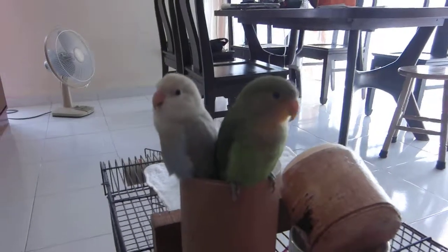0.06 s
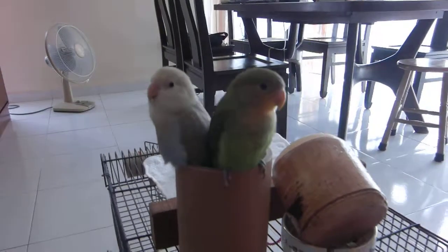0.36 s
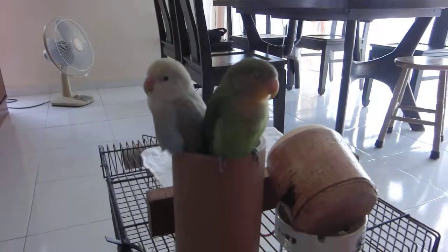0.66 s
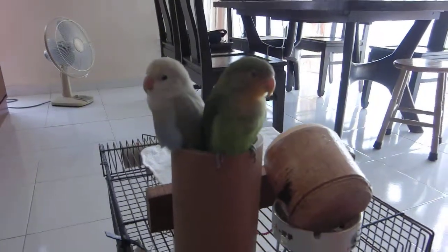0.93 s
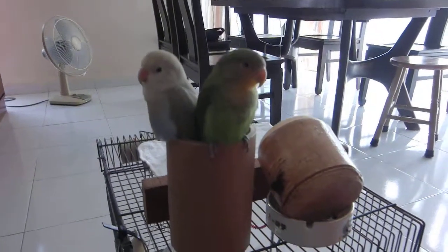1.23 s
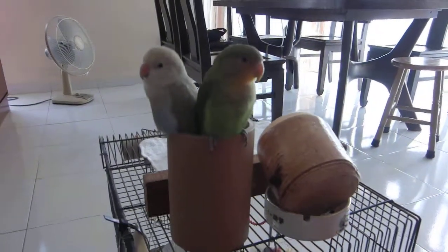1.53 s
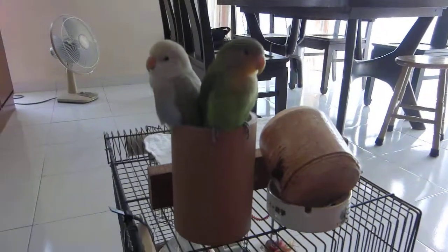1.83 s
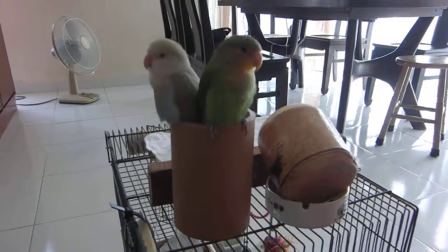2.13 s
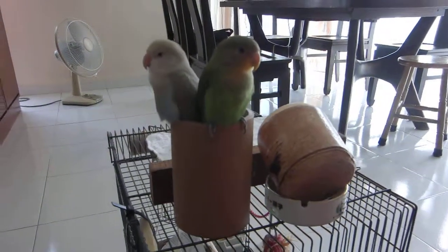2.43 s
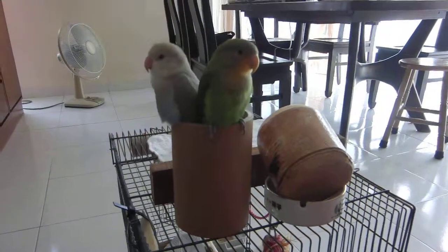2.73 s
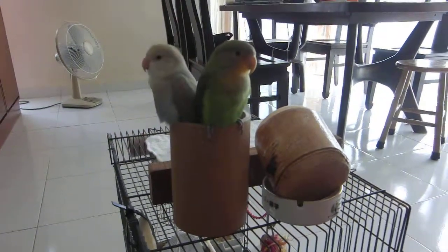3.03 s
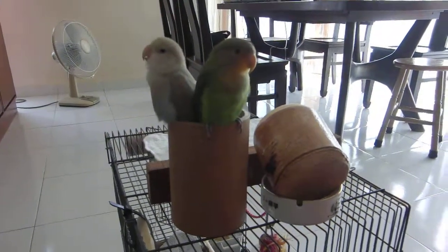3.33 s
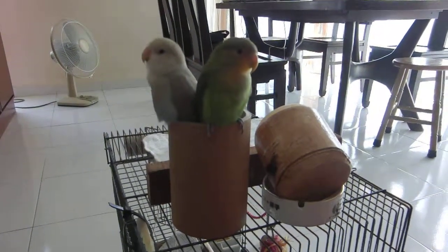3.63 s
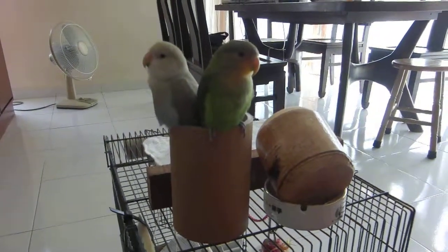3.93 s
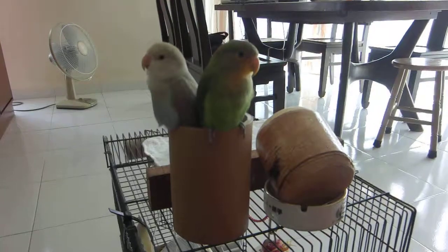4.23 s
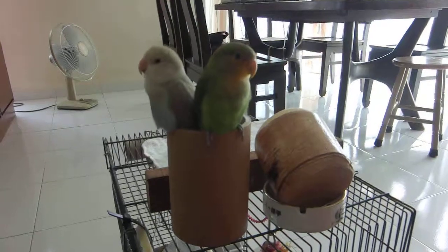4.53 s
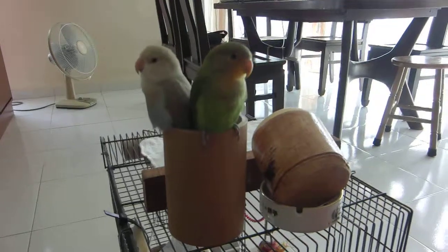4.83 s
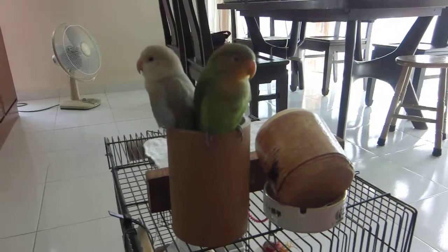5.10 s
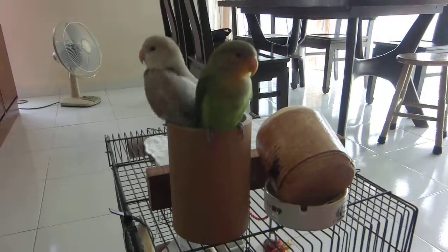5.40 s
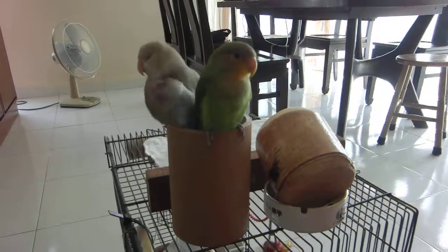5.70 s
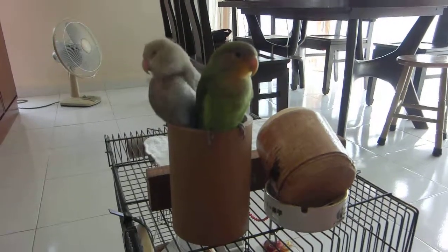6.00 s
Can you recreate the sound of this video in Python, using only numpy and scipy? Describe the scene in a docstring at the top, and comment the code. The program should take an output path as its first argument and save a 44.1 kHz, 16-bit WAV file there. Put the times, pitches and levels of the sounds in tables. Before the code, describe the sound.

Small parrots call close to a stereo microphone in a tiled room, while a fan rushes softly and a deep hum swells and fades. First comes a brief reedy warble with a whistle in its middle. A beak click leads into four quick, shrill rising chirps, the loudest sounds. A soft chuck and squawk follow, then very faint feather preening. A thin, barely audible whine sinks slowly toward the end.

```python
"""Lovebirds in a tiled room

Two lovebirds perch on their cage, close to a stereo microphone. One gives a reedy warble with a
whistle in its middle, four shrill rising chirps and a soft chuck and squawk; then feathers are preened.
Each call is a buzz of the syrinx, filtered by the throat and beak and prolonged by the room.
Under them a fan rushes, a deep hum swells and fades, and a faint whine sinks slowly."""
import sys
import numpy as np
from scipy import signal
from scipy.fft import rfft, irfft
from scipy.io import wavfile
from scipy.ndimage import uniform_filter1d

SR = 44100
rng = np.random.default_rng(int(sys.argv[2]) if len(sys.argv) > 2 else 0)


def unload_wav(signal):
    """Save mono or channel-first audio to the path in sys.argv[1] as 16-bit WAV at rate SR, clipped to [-1, 1]."""
    wavfile.write(
        sys.argv[1],
        SR,
        np.round(np.clip(np.atleast_2d(signal).T, -1, 1) * 32767).astype(np.int16),
    )


N = 267157
TIME, BINS = np.arange(N) / SR, np.fft.rfftfreq(N, 1 / SR)


def amp(db):
    """Amplitude ratio of a level in decibels."""
    return 10 ** (np.asarray(db) / 20)


def unit(x):
    """Normalisation to an rms of one."""
    return x / np.sqrt(np.mean(x ** 2) + 1e-20)


def read(points, hz):
    """Interpolation of a table on a logarithmic frequency axis."""
    f, value = np.transpose(points)
    return np.interp(np.log(hz + 1), np.log(f + 1), value)


def noise(spectrum, size=N):
    """Spectral shaping: white noise filtered to the given colour, of rms one."""
    gain = amp(read(spectrum, np.fft.rfftfreq(size, 1 / SR)))
    return unit(irfft(rfft(rng.standard_normal(size)) * gain, size))


def waver(rate_hz, size=N):
    """Random modulation: noise of rms one, low-passed near the given rate."""
    gain = np.exp(-(np.fft.rfftfreq(size, 1 / SR) / rate_hz) ** 2)
    return unit(irfft(rfft(rng.standard_normal(size)) * gain, size))


def fan(side_db=-10.0, left_db=1.42, fade_db_per_s=-0.0655):
    """Turbulent air radiates broadband noise, nearly coherent in the bass and diffuse in the treble."""
    # spectra of the channels' sum and difference: f/Hz, relative level/dB
    mid_spectrum = [(12, -40), (20, -16.5), (44, 1.5), (64, -3), (80, -5.5), (100, -3), (161, -5),
                    (196, -6.5), (232, -8), (298, -2), (352, -11), (705, -14.5), (1980, -23), (2470, -27),
                    (3750, -35.5), (15500, -56.5)]
    side_spectrum = [(12, -22.5), (20, 0), (196, -8.5), (232, -5), (289, -11.5), (342, -10.5), (1380, -8),
                     (2090, -10), (2470, -8.5), (9930, -24.5), (15500, -32.5)]
    mid, side = noise(mid_spectrum), amp(side_db) * noise(side_spectrum)
    stereo = np.array([mid * amp(left_db) + side, mid * amp(-left_db) - side])
    return amp(-48.5 + fade_db_per_s * TIME) * stereo


def drone(hz, level_db, jitter, rate_hz):
    """A sinusoid under random frequency and amplitude modulation."""
    phase = 2 * np.pi * np.cumsum(hz * (1 + jitter * waver(rate_hz))) / SR
    return np.sqrt(2) * amp(level_db + 1.3 * waver(rate_hz)) * np.sin(phase)


def hum(rest_hz=45.6, rest_db=-63.5):
    """A deep tone whose swells, Gaussian in rise and exponential in decay, pull it to their own pitch."""
    # swells: peak t/s, f/Hz, level/dB, rise t/s, decay t/s
    swells = [(1.15, 53.24, -48, 0.12, .25), (3.03, 44.3, -48, .1, 0.12), (4.2, 43.8, -49.5, 0.21, .6)]
    envelopes = [amp(db) * np.exp(-np.where(TIME < peak, ((TIME - peak) / rise) ** 2,
                                            (TIME - peak) / decay))
                 for peak, _, db, rise, decay in swells]
    strength = amp(rest_db) + sum(envelopes)
    pull_hz = sum(envelope * (hz - rest_hz) for envelope, (_, hz, *_) in zip(envelopes, swells))
    tone = drone(rest_hz + pull_hz / strength, 20 * np.log10(strength), jitter=0.017, rate_hz=7.9)
    return tone * amp([[1.1], [-1.1]])


def syrinx(start, hz, level_db, throat, even_db, jitter, rasp_db,
           slope_db_per_octave, rasp_db_per_octave, shimmer, flutter_hz):
    """Source and filter: the syrinx buzzes, and the throat colours its harmonics and breath alike."""
    out, n = np.zeros(N), len(hz)
    tremble, throb = waver(flutter_hz, size=SR)[:n], waver(flutter_hz, size=SR)[:n]
    air = noise([(f, db + rasp_db_per_octave * np.log2(f)) for f, db in throat], size=SR)[:n]
    k, t = np.arange(1, 11)[:, None], np.arange(n) / SR
    # the symmetry of the vibration sets even against odd harmonics
    source_db = slope_db_per_octave * np.log2(k) + even_db * (k % 2 == 0)
    phase = 2 * np.pi * np.cumsum(hz * (1 + jitter * tremble)) / SR
    partials = amp(read(throat, k * hz) + source_db) * (k * hz < SR / 2)
    tone = (partials * np.sin(k * phase)).sum(0) / np.sqrt((partials ** 2).sum(0) / 2)
    voice = tone * (1 + shimmer * throb) + amp(rasp_db) * air
    edges = np.clip(np.minimum(t, t[::-1]) / .001, 0, 1)
    out[round(start * SR):][:n] = edges * amp(level_db) * voice
    return out


def soft_calls(settle_share=0.48, trill_hz=70.7, onset_db=-11, end_db=-12.5):
    """Frequency modulation: each note trills about an exponential glide as it swells and sinks."""
    # four warble notes, three of chuck and squawk: start t/s, length t/s, first f/Hz, last f/Hz,
    # level/dB, peak time/length, trill depth, jitter, even harmonics/dB, rasp/dB
    notes = [ (1.267, .028, 2023, 2165, -17.5, 0.98, 0.05, 0.013, -2, -17.5),
             (1.293, .044, 3470, 3713, -23, 0.77, 0.0032, .011, -3, -12.5),
             (1.344, 0.026, 3630, 3550, -25, 0.64, 0.0033, 0.0074, -1, -9),
             (1.367, .079, 2860, 1636, -25, 0.35, 0.0083, 0.0227, -2.5, -14.5),
             (4.27, 0.0356, 1706, 1559, -29, .35, 0.049, 0.018, 4, -18),
             (4.339, 0.03, 1735, 1730, -32, .25, 0.0088, 0.051, 0.5, -13),
             (4.36, 0.024, 1570, 1475, -31.5, .8, 0.015, 0.023, 2.5, -7)]
    # throat response, beak half open: f/Hz, level/dB
    half_beak = [(200, -19.5), (1100, -0.5), (1550, -3.5), (2200, -15.5), (2700, -0.5), (3200, 6.5),
                 (4200, 1.5), (6000, 6.5), (6700, 0.5), (7400, -0.5), (9000, -3), (11000, -3),
                 (12800, -14.5), (15500, -9)]
    out = np.zeros(N)
    for start, length, first_hz, last_hz, db, peak, trill, jitter, even_db, rasp_db in notes:
        t = np.arange(0, length, 1 / SR)
        u, peak = t / length, np.clip(peak, .05, .95)
        settled = np.expm1(-u / settle_share) / np.expm1(-1 / settle_share)
        glide_hz = first_hz + (last_hz - first_hz) * settled
        hz = glide_hz * (1 + trill * np.cos(2 * np.pi * trill_hz * t))
        sag_db = np.where(u < peak, onset_db * (1 - u / peak) ** 2,
                          end_db * ((u - peak) / (1 - peak)) ** 2)
        out += syrinx(start, hz, db + sag_db, half_beak, even_db, jitter, rasp_db,
                      slope_db_per_octave=-4, rasp_db_per_octave=2.5, shimmer=0.15, flutter_hz=600)
    return out


def preening():
    """Impulsive excitation: each beak click or feather flick is noise that decays exponentially."""
    # clicks and flicks: t/s, level/dB, decay t/s
    ticks = [(2.801, -38, 0.0009), (2.812, -28.5, 0.00097), (5.172, -51, .003), (5.329, -54, 0.02),
             (5.42, -60, 0.032), (5.6, -61, 0.022), (5.85, -64, 0.027)]
    # their spectrum: f/Hz, relative level/dB
    colour = [(1000, -18.5), (3500, -2.5), (5300, -2), (7000, -8.5), (15000, -8.5)]
    envelope = sum(amp(db) * (TIME >= start) * np.exp(-abs(TIME - start) / decay)
                   for start, db, decay in ticks)
    return envelope * noise(colour)


def chirps(lead_arch=.16, top_arch=0.045, peak_share=.65, break_ratio=1.25, flicker_hz=219):
    """A frequency jump: after a lead-in, a climbing whistle flickers and breaks to a weaker top note."""
    # chirps: start t/s, lead-in t/s, whistle t/s, top note t/s, flicker t/s, lead-in f/Hz, whistle's
    # first f/Hz, last f/Hz, exponent of the climb, relative onset/dB, relative peak/dB, jitter, rasp/dB
    calls = [ (2.824, 0.0031, 0.031, 0.016, .001, 3610, 3620, 5183, 0.84, -24, -16.5, 0.026, -13),
             (3.0973, 0.013, 0.028, 0.012, .0005, 3098, 4520, 5486, 0.95, -20.5, -10.5, 0.021, -13.5),
             (3.3072, .0075, .034, 0.012, .005, 2505, 3880, 4910, 1.2, -26.5, -8, 0.023, -13.5),
             (3.487, 0.0082, .036, .014, .009, 4450, 3955, 5000, 1.8, -9, -10, .028, -13)]
    # throat response, beak wide open: f/Hz, level/dB
    open_beak = [(200, -16), (900, -10.5), (2300, -13), (3000, -11), (3750, -4.5), (4850, 1.5), (6300, 1.5),
                 (7400, -10), (8300, -4), (9600, -1.5), (10900, -1.5), (11700, -7), (13000, -5),
                 (14200, -9), (15500, -14)]
    out = np.zeros(N)
    for (start, lead, whistle, top, flicker, lead_hz, first_hz, last_hz,
         bend, onset_db, peak_db, jitter, rasp_db) in calls:
        t = np.arange(0, lead + whistle + top, 1 / SR)
        late = np.maximum(t - lead - whistle, 0) / top
        broken = t + flicker * np.tanh(waver(flicker_hz, size=SR)[:len(t)]) > lead + whistle
        lead_in = lead_hz * (1 - lead_arch * (2 * t / lead - 1) ** 2)
        climb = first_hz + (last_hz - first_hz) * np.clip((t - lead) / whistle, 0, 1) ** bend
        top_note = last_hz * break_ratio * (1 - top_arch * (2 * late - 1) ** 2)
        hz = np.where(t < lead, lead_in, np.where(broken, top_note, climb))
        effort_db = np.interp(t, [0, lead + peak_share * whistle], [onset_db, peak_db]) - 5 * late
        level_db = effort_db - 3 * (t < lead) - 3.5 * broken
        out += syrinx(start, hz, level_db, open_beak, -2.5, jitter, rasp_db,
                      slope_db_per_octave=-6, rasp_db_per_octave=1.32, shimmer=.12, flutter_hz=690)
    return out


def whine(start=3.8, first_hz=2560, sag_hz_per_s=113, first_db=-65.5, growth_db_per_s=1):
    """A thin tone sinks as it grows; incoherence between the channels makes it diffuse."""
    age = TIME - start
    hz = first_hz - sag_hz_per_s * age
    level_db = first_db + growth_db_per_s * age + 1.4 * waver(rate_hz=3.4)
    return np.array([drone(hz, level_db, jitter=.018, rate_hz=57) for _ in range(2)]) * (age >= 0)


def direct(x):
    """Interference: the straight path and a few echoes add, and reach the two ports out of phase."""
    # reflections off cage, floor and furniture: delay t/s, level/dB
    echoes = [(.0074, -16), (0.0152, -14.5), (.027, -31)]
    # lead of the left microphone port over the right: f/Hz, phase/rad
    phase_lead = [(300, .2), (1800, .7), (2600, 1.4), (4000, 2.2), (7000, 2.3), (9000, 2.45), (15000, 2.55)]
    # gain of the left port, opposite at the right: f/Hz, level/dB
    port_gain = [(1500, 2.8), (3000, -1.3), (4500, 0.24), (8000, 1.3)]
    paths = 1 + sum(amp(db) * np.exp(-2j * np.pi * BINS * delay) for delay, db in echoes)
    left = np.exp(.5j * read(phase_lead, BINS)) * amp(read(port_gain, BINS))
    return irfft(rfft(x) * paths * np.array([left, 1 / left]), N)


def room(x, wet_db=-42.5, early_db=-43.5, early_t60=0.25):
    """Reverberation: a quick scatter from near things, and a diffuse tail that lasts longest at 4 kHz."""
    # reverberation time: f/Hz, T60/s
    t60 = [(1000, 0.6), (4000, 0.9), (6000, 0.7748), (9000, 0.65), (15000, 0.6)]
    # width of the diffuse field: f/Hz, side minus mid level/dB
    width = [(300, -10), (1500, -3), (2500, 1), (4000, 10), (6500, 13), (10000, 11.5), (15000, 8)]
    hz, t, spectra = signal.stft(rng.standard_normal((2, SR)), SR, nperseg=256)
    spectra *= amp(wet_db - 60 * t / read(t60, hz)[:, None]) + amp(early_db - 60 * t / early_t60)
    side_gain = amp(read(width, hz))[:, None]
    spectra = np.array([spectra[0], spectra[1] * side_gain]) / np.sqrt(1 + side_gain ** 2)
    _, (mid, side) = signal.istft(spectra, SR, nperseg=256)
    build_up = np.minimum(np.arange(len(mid)) / (0.0023 * SR), 1)
    tails = np.array([mid + side, mid - side]) * build_up
    return signal.fftconvolve(x[None], tails, axes=1)[:, :N]


def limit(x, ceiling_db=-9.3, recovery_db_per_s=400):
    """Limiting: the gain falls as short-time power exceeds a ceiling, then recovers quickly."""
    power_db = 10 * np.log10(abs(uniform_filter1d((x ** 2).mean(0), size=90)) + 1e-12)
    fall_db = TIME * recovery_db_per_s
    held_db = np.maximum.accumulate(power_db + fall_db) - fall_db
    over_db = np.maximum(held_db - ceiling_db, 0)
    return x * amp(-uniform_filter1d(over_db, size=45))


def scene():
    """Superposition of the birds' direct and reverberant fields with the background."""
    birds = soft_calls() + amp(1.5) * chirps() + preening()
    return direct(birds) + room(birds) + fan() + hum() + whine()


def record(dry):
    """Limiting, then a steep low-pass filter at 15.8 kHz."""
    low_pass = signal.firwin(511, 15800, window=("kaiser", 9), fs=SR)
    return signal.oaconvolve(limit(dry), low_pass[None], "same")


dry = scene()
out = record(dry)
unload_wav(out)
```